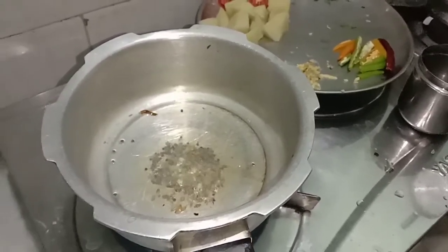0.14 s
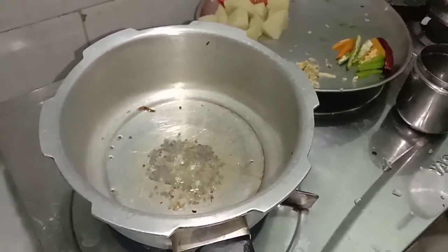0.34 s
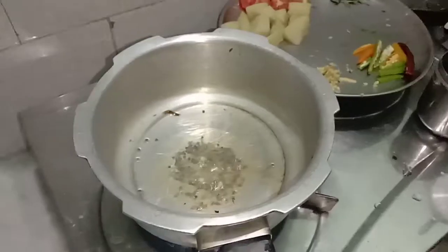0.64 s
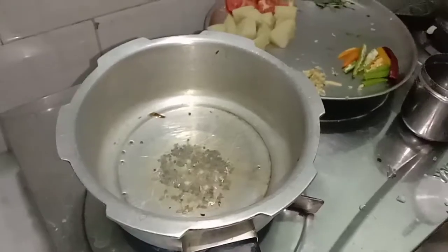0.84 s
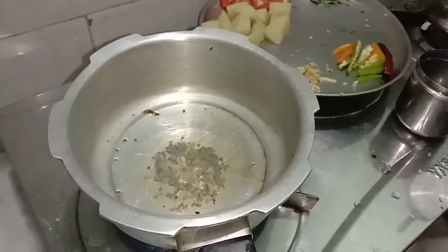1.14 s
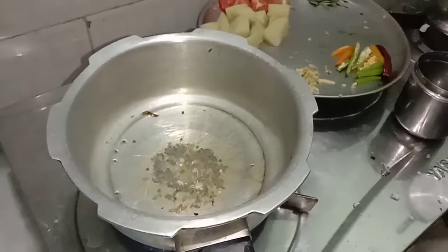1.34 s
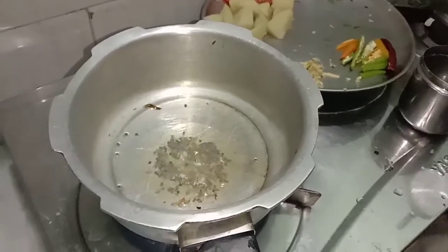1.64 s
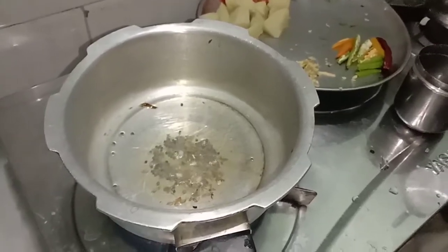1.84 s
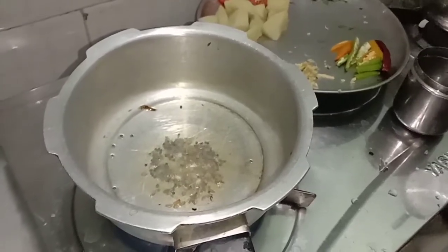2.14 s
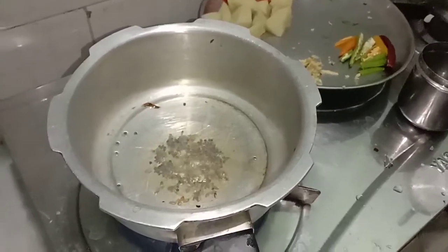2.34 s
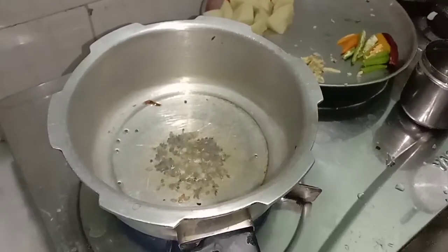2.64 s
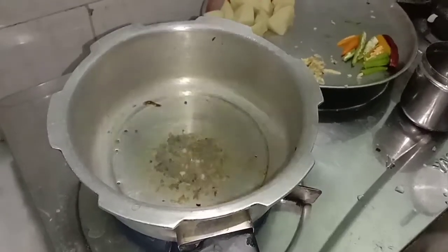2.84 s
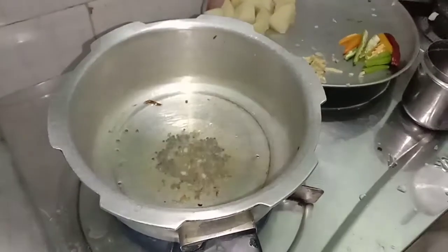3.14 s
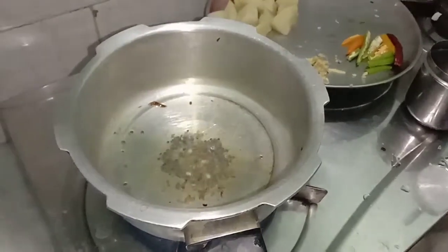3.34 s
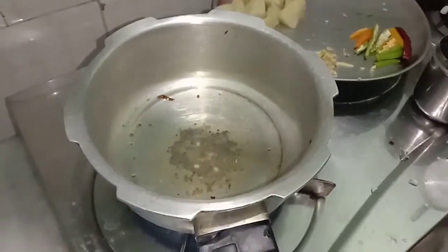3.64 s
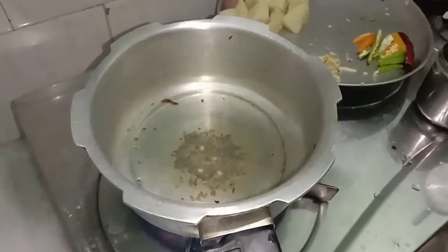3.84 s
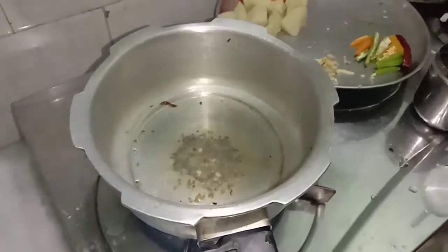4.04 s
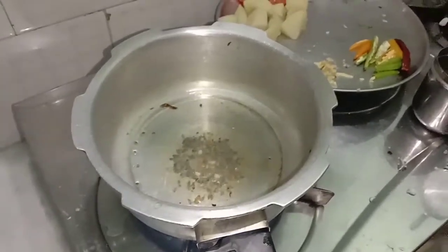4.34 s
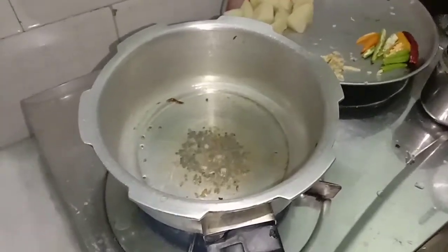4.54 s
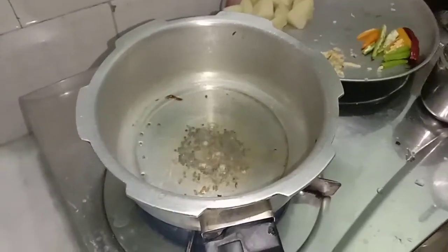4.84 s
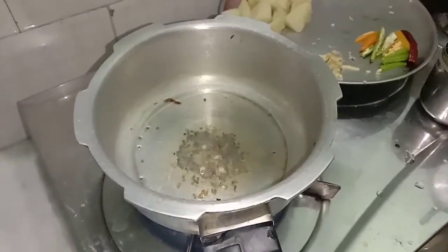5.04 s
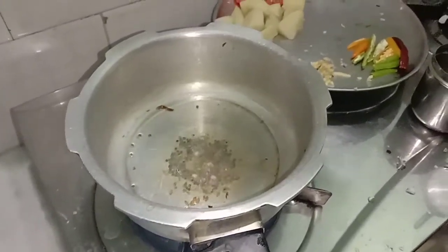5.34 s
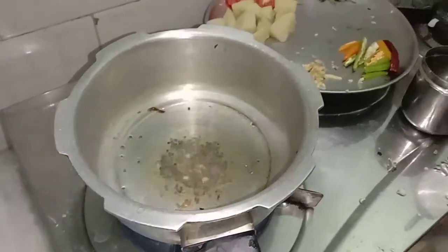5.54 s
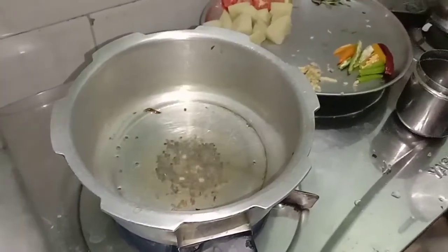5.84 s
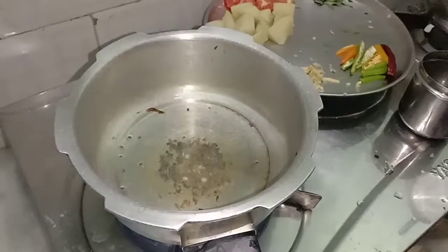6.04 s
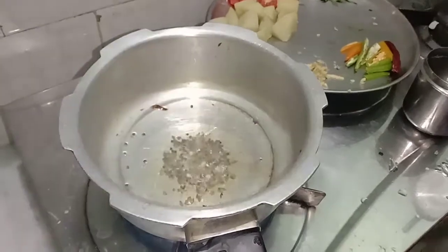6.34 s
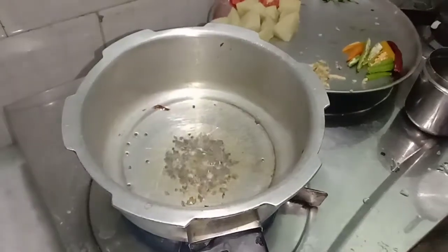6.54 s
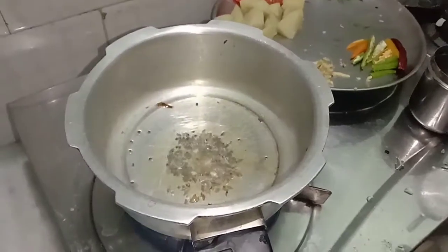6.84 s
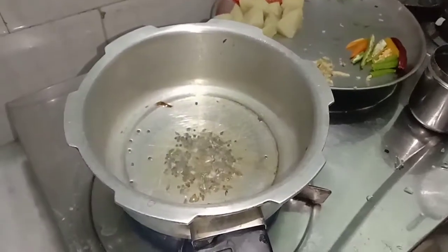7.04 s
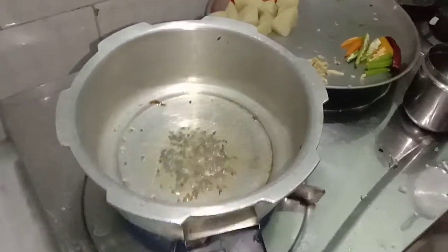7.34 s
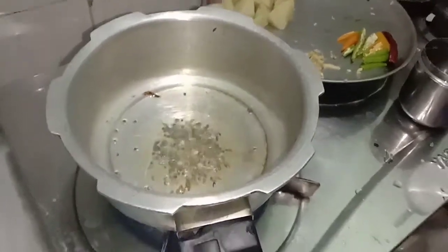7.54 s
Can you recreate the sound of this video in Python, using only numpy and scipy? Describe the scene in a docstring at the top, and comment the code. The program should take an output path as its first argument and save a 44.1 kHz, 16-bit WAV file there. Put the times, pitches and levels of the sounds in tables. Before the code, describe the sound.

Close to a stove in a small kitchen, oil sizzles faintly in a metal pot while a burner murmurs. Single seeds snap sharply, each ringing briefly in the pot, and steam spits as steel dishes are softly knocked and rubbed. After one loud crack and a short lull, the hiss swells and the popping turns quick and dense, with another metallic knock among the pops.

```python
"""Seeds popping in hot oil

Seeds burst at the bottom of a deep metal pot, first one by one, then close together. Each burst
cracks, rings the air in the pot and dies away in a small tiled kitchen; some loud ones also thump.
The oil sizzles and steam spits now and then. Steelware is knocked and rubbed nearby, a few soft low
bumps and a brief hum sound, and the burner murmurs under it all."""
import sys
import numpy as np
from scipy import signal
from scipy.fft import rfft, irfft
from scipy.io import wavfile
from scipy.ndimage import uniform_filter1d

SR = 44100
rng = np.random.default_rng(int(sys.argv[2]) if len(sys.argv) > 2 else 0)


def wrap_up_sound(samples):
    """Save the sound to the file named by the first command line argument, as 16-bit audio."""
    columns = np.atleast_2d(samples).T
    # keep every value between -1 and 1, then stretch to whole-number steps
    tamed = np.clip(columns, -1, 1)
    steps = np.round(tamed * 32767).astype(np.int16)
    wavfile.write(sys.argv[1], SR, steps)


N = 339129

# air and wall resonances of the pot: f/Hz, width/Hz, gain/dB
POT_MODES = [(821, 200, 11.5), (1251, 72, 11.5), (1802, 100, 7), (2240, 173, 0.5), (3040, 260, 5),
             (3696, 160, 2), (4855, 140, 1), (5550, 59, 4.5), (6940, 140, 4.5), (7300, 190, 6),
             (9350, 1750, 4.5)]
# response of the microphone and its port: f/Hz, gain/dB
MIC_RESPONSE = [(60, -18.5), (300, -14.5), (600, -15), (1500, -9), (2200, -9), (6000, -2.5), (10500, -3),
                (12500, -6), (13800, -4.5), (14800, 3), (15400, 8.5), (15650, -47), (17000, -22)]


def amp(db):
    return 10 ** (np.asarray(db) / 20)


def unit_rms(x):
    return x / np.sqrt(np.mean(x ** 2) + 1e-20)


def decay(t, t60_s):
    return np.exp(-np.log(1000) * t / t60_s)


def curve_db(points, hz):
    """Interpolate (f/Hz, level/dB) points over log frequency."""
    f, db = np.transpose(points)
    return np.interp(np.log(hz + 1), np.log(f + 1), db)


def peaks_db(peaks, hz):
    """Sum of bell curves (f/Hz, width/Hz, gain/dB)."""
    return sum(db / (1 + (2 * (hz - f) / width) ** 2) for f, width, db in peaks)


def add(mix, start_s, sound):
    part = mix[round(start_s * SR):][:len(sound)]
    part += sound[:len(part)]


def colour(x, gain_db):
    """Minimum-phase filter with the response gain_db(hz)."""
    size = 4096
    cepstrum = irfft(np.log(amp(gain_db(np.fft.rfftfreq(size, 1 / SR)))))
    cepstrum[1:size // 2] *= 2
    cepstrum[size // 2 + 1:] = 0
    impulse = irfft(np.exp(rfft(cepstrum)))
    return signal.oaconvolve(x, impulse)[:len(x)]


def patchy_noise(spectrum, levels, patch_db, patch_bins, patch_frames):
    """Noise with drifting spectral patches, following a (t/s, level/dB) curve."""
    frames, hz = N // 256 + 5, np.fft.rfftfreq(1024, 1 / SR)
    real, imag, patches = rng.standard_normal((frames, len(hz), 3)).T
    patches = uniform_filter1d(patches, patch_bins, axis=0)
    patches = unit_rms(uniform_filter1d(patches, patch_frames, axis=1))
    stft = (real + 1j * imag) * amp(curve_db(spectrum, hz)[:, None] + patch_db * patches)
    noise = unit_rms(signal.istft(stft, nperseg=1024, noverlap=768)[1][:N])
    return amp(np.interp(np.arange(N) / SR, *np.transpose(levels))) * noise


def burner():
    """Low murmur of the flame."""
    spectrum = [(18, -79), (30, -34), (97, 6.5), (171, -12.5), (197, -15.5), (300, -8), (465, -15.5),
                (595, -9), (876, -19.5), (1040, -14.5), (2000, -20), (2600, -98), (4400, -120)]  # f/Hz, relative density/dB
    levels = [(0.0, -62), (0.51, -61.5), (4.24, -62), (4.67, -59), (7.69, -60.5)]  # t/s, level/dB
    return patchy_noise(spectrum, levels, patch_db=2.95, patch_bins=3, patch_frames=18)


def sizzle():
    """Continuous hiss of frying oil, coloured by the pot."""
    spectrum = [(900, -57), (1300, -4), (1900, -1), (2500, 0), (3800, -1.5), (5300, -1), (6300, -6),
                (7100, 1.5), (8000, -4.5), (9500, 0.5), (10800, -6.5), (12600, -14), (14900, -5),
                (15500, 0), (16000, -48)]  # f/Hz, relative density/dB
    levels = [(0, -69.5), (.9, -60), (1.5, -66), (2.4, -69), (3, -69), (4.25, -69), (4.6, -43.5),
              (5.35, -65.5), (5.6, -53), (6.6, -60), (6.9, -47), (7.3, -55), (7.69, -64.5)]  # t/s, level/dB
    hiss = patchy_noise(spectrum, levels, patch_db=2.5, patch_bins=5, patch_frames=14)
    return colour(hiss, lambda hz: 0.72 * peaks_db(POT_MODES, hz))


def thump(level_db, hz, length_s):
    """A low sine under a smooth hump: the thump of a loud pop, a soft bump or, if long, a hum."""
    t = np.arange(0, length_s, 1 / SR)
    return amp(level_db) * np.sin(2 * np.pi * hz * t) * np.sin(np.pi * t / length_s)


def steel_knock(level_db, centre_hz, spread_oct, t60_factor, contact_s):
    """A gritty contact ticks and rings the steel modes around centre_hz; the walls smear both."""
    steel_modes = [(520, -4, .14), (630, -7, .12), (904, -5, .16), (946, -7, .2), (1039, -4.5, .16),
                   (1150, -6, .1), (1260, 0, .2), (1500, -9, .1), (1810, -7, .2), (2030, -6, .13),
                   (2293, -4, .12), (2700, -9, .1), (3036, -5, .1), (3280, -3, .13), (4544, -2, .13),
                   (5507, -10, .07), (6100, -9, .05), (6498, -1, .09), (7250, -3, .14), (8489, -10, .05)]  # f/Hz, level/dB, t60/s

    def excitation_db(hz):
        return np.maximum(-6 * (np.log2(hz / centre_hz + 0.0033) / spread_oct) ** 2, -80)

    t = np.arange(SR // 2) / SR
    excited = [mode for mode in steel_modes if excitation_db(mode[0]) > -50]
    hz, mode_db, t60_s = np.transpose(excited)[:, :, None]
    jitter = rng.standard_normal((len(steel_modes), 70))[:len(hz)]
    rattle = 1 + 0.75 * unit_rms(signal.resample(jitter, len(t), axis=1))  # loose stack
    envelopes = amp(mode_db + excitation_db(hz)) * rattle * decay(t, t60_s * t60_factor)
    ring = (envelopes * np.sin(2 * np.pi * hz * t)).sum(0)
    tick = colour(rng.standard_normal(len(t)) * decay(t, 0.02), excitation_db)
    direct = unit_rms(ring) + amp(-8) * unit_rms(tick)
    room = rng.standard_normal(SR // 4) * decay(t[:SR // 4], 0.4)
    reverb = signal.fftconvolve(direct * decay(t, 0.27), room / np.linalg.norm(room))[:len(t)]
    contact_samples = round(contact_s * SR) + 3
    force = rng.standard_normal(SR // 4)[:contact_samples] * np.hanning(contact_samples)
    force *= contact_s / 0.012 / np.linalg.norm(force)  # long contacts are mostly scrape
    force[0] += 1  # the blow
    struck = signal.fftconvolve(direct + amp(-8) * reverb, force)[:len(t)]
    low_cut = signal.butter(3, 350, "high", fs=SR, output="sos")  # small vessels radiate no bass
    return amp(level_db) * unit_rms(signal.sosfilt(low_cut, struck))


def spot_peaks(count, width_hz, sigma_db):
    """Random peaks and dips set by the spot of a burst in the pot."""
    centres_hz = rng.uniform(1500, 11000, count)
    return [(f, width_hz, db) for f, db in zip(centres_hz, rng.normal(0, sigma_db, count))]


def steam_spurt(swell_s, hold_s, level_db, brightness):
    """Hiss of tiny uneven bursts, coloured by the pot; it swells and brightens, holds, then fades."""
    swell_db, fade_db_per_s, fade_s = 7.5, 320, 0.11
    t = np.arange(0, swell_s + hold_s + fade_s, 1 / SR)
    grains = rng.standard_normal(len(t))
    grains *= amp(3.2 * unit_rms(uniform_filter1d(rng.standard_normal(len(t)), 90)))
    peaks = POT_MODES + spot_peaks(14, width_hz=200, sigma_db=3) + [(13740, 11300, -26)]

    def hiss(db_per_oct):
        tilted = colour(grains, lambda hz: db_per_oct * np.log2(hz / 4000 + 0.049) + peaks_db(peaks, hz))
        return unit_rms(tilted)

    rise = np.minimum(t / swell_s, 1)
    blend = brightness * rise
    steam = (1 - blend) * hiss(-6) + blend * hiss(3)
    envelope_db = swell_db * (rise - 1) - fade_db_per_s * np.maximum(t - swell_s - hold_s, 0)
    return amp(level_db + envelope_db) * steam * signal.windows.tukey(len(t), 0.05)


def seed_pop(level_db, body_db, ring_hz, ring_db, tail_db):
    """A seed bursts: a snap, quick echoes between the pot walls, then the tail of the kitchen."""
    bands_hz = [400, 1000, 8000, 14500]  # bass, body, treble, top: f/Hz
    t = np.arange(SR // 3) / SR
    snap = rng.choice([-1., 1.], len(t)) * (1 - decay(t, 0.001)) * decay(t, 0.006)
    pot_noise, room_noise = rng.standard_normal((2, len(t)))
    echoes = amp(-7) * pot_noise * decay(t, 0.03)
    lows = uniform_filter1d(room_noise, size=3)
    highs = room_noise - lows
    tail = amp(tail_db) * (lows * decay(t, 0.28) + 0.77 * highs * decay(t, 0.2))  # walls absorb treble
    burst = 1.9 * snap + (1 - decay(t, 0.008)) * (echoes + 1.5 * tail)
    top_db = -5 - 0.6 * ring_db  # hollow pops are duller
    tilt = np.transpose([bands_hz, [body_db - 5, body_db, 0, top_db]])
    peaks = POT_MODES + spot_peaks(8, width_hz=400, sigma_db=2.5) + [(ring_hz, 1500, ring_db)]

    def shape_db(hz):
        return curve_db(tilt, hz) + peaks_db(peaks, hz)

    grid_hz = np.fft.rfftfreq(512, 1 / SR)
    mean_db = 10 * np.log10(np.mean(amp(shape_db(grid_hz) + curve_db(MIC_RESPONSE, grid_hz)) ** 2))
    return amp(level_db) * colour(burst, lambda hz: shape_db(hz) - mean_db)


def scene():
    """Pops, steam and sizzle pass the pot wall modes; knocks, thumps and burner are added plain."""
    # seed bursts: t/s, level/dB, body over treble/dB, hollow ring f/Hz, ring gain/dB, tail gain/dB
    pops = [(0.1844, -28, 5, 4030, -3.5, -13), (0.519, -20, 25, 2930, 2, -15),
            (0.6739, -26.5, -20, 4220, 18, -27), (0.9292, -27.5, 19, 4330, 0, -20),
            (0.9796, -31, 14, 2600, 2, -18), (1.3008, -28.5, 3.5, 3740, 18.5, -10),
            (1.899, -30, -1, 4700, 4, -13.5), (2.2537, -35, 3, 4820, 3, -6.5),
            (2.9546, -36.5, 9, 3870, 22, -16), (2.9686, -11, -8.5, 4300, 0.5, -14),
            (3.0435, -24.5, 5.5, 3020, 20.5, -10.5), (3.1856, -17, -3.5, 2980, -2.5, -18),
            (3.4275, -44.5, 5, 4200, 1, -4.5), (3.4417, -31.5, -28, 4050, 11, -20.5),
            (3.6216, -22, 5.5, 4270, 12.5, -13), (3.7684, -53.5, 15, 4170, 18, -4.5),
            (3.905, -59, -7, 3500, 18, -6.5), (4.2898, -19.5, 4.5, 3460, 19.5, -14),
            (4.622, -17, 7.5, 3020, 12.5, -15.5), (4.6828, -22, -7, 4400, 6.5, 1.5),
            (4.7589, -21.5, 2.5, 4370, 7, -11.5), (4.95, -44, 9, 3440, 4, -4),
            (4.9648, -12, 3, 3200, 7.5, -16), (5.1516, -31, 6, 4350, 2, -15.5),
            (5.2419, -54.5, 5, 3100, -6, -1.5), (5.3573, -49, -3, 3260, 1, 0.5),
            (5.3803, -27, 2.5, 3440, 7, -11.5), (5.417, -21, 7, 3650, 16, -18),
            (5.4965, -32, 5, 4220, 14, -12), (5.5253, -30.5, 8.5, 3770, 8.5, -8),
            (5.594, -20, 4, 3600, 11, -13.5), (5.736, -28.5, 14, 3160, 24, -15),
            (5.7726, -19, 11.5, 4060, 13, -8.5), (5.863, -23, 20.5, 3280, 12.5, -10.5),
            (5.9094, -42, 37, 3200, 5, 0), (6.0276, -23, 6.5, 2850, 6, -11),
            (6.0667, -38, 20.5, 3750, 16, -2.5), (6.1858, -18.5, 2, 3100, -3.5, -17.5),
            (6.2275, -18.5, 9, 3570, 25, -16), (6.31, -20.5, -4.5, 3330, 2, -15.5),
            (6.3704, -34.5, 1.5, 3300, 13, -4.5), (6.4541, -34.5, 5, 3620, 0, -7.5),
            (6.529, -38, 26, 3850, 15.5, -11.5), (6.6141, -27, 4, 3380, 10.5, -12.5),
            (6.6546, -36, 15, 3560, -6, -11), (6.6873, -37, 7, 3560, 17, -1),
            (6.7173, -19.5, 4.5, 2880, 16, -9), (6.837, -12.5, -3, 3750, 1, -13.5),
            (6.8742, -23, -1, 3160, 22, -14.5), (6.937, -27.5, -2, 3500, 8, -16.5),
            (6.993, -19.5, -1.5, 3400, 8, -12), (7.0615, -19.5, -2.5, 5340, 9, -15.5),
            (7.1244, -19, 1.5, 3680, 5, -13), (7.3069, -24, 11.5, 3060, 6.5, -15),
            (7.3676, -24, 6, 3770, 15, -12), (7.4685, -38, 0, 3660, -3, -5.5),
            (7.5192, -35.5, -2, 4750, 7, -15.5), (7.627, -33.5, 10.5, 3250, 17.5, 0.5),
            (7.6357, -12, 2, 3230, -7.5, -16.5), (7.6802, -20, 3, 3940, 17, -15)]
    # steam from the oil: t/s, swell/s, hold/s, level/dB, brightness/0-1
    spurts = [(.13, 0.034, .04, -42.5, 0.4), (0.421, 0.086, 0.021, -34.5, 0.05),
              (0.584, 0.026, 0.037, -31, 1), (0.669, 0.0066, 0.023, -33, 0.55),
              (0.869, 0.076, 0.14, -32.5, 0.71), (1.243, 0.029, .012, -45, 1),
              (4.298, 0.16, .14, -37.5, 0.95), (4.671, 0.023, 0.064, -26.5, 0.97)]
    # knocks and rubs on steelware: t/s, level/dB, centre f/Hz, spread/oct, t60 factor, contact/s
    knocks = [(0.315, -66.5, 1110, .4, 1.5, 0.047), (0.533, -44, 517, 0.33, 1.5, 0.0019),
              (.831, -48, 2930, 1.27, 0.31, 0.0016), (0.867, -59, 1035, 0.17, .9, 0.033),
              (1.008, -36.5, 2400, 1.25, .7, 0.0013), (1.038, -56, 1100, 0.4, 2.3, 0.023),
              (1.096, -55, 2070, 1.15, 0.84, 0.0034), (1.14, -59.5, 967, 0.12, 0.89, 0.029),
              (1.254, -57.5, 2070, 0.24, 1.4, 0.049), (1.55, -56, 1105, 0.29, 1.04, 0.067),
              (1.555, -54.5, 4120, 0.72, .3, 0.069), (1.786, -56, 1140, 0.26, 1.2, 0.14),
              (1.827, -56.5, 5080, 0.79, 0.47, 0.023), (2.029, -67, 3490, 0.83, 0.87, 0.11),
              (2.715, -66, 2150, 0.52, 1.4, 0.038), (5.812, -31, 1070, 0.68, 1.3, 0.0047),
              (5.832, -54, 1060, 1.1, .75, 0.012), (5.959, -41.5, 944, 0.56, 1.7, 0.0059),
              (6.47, -58.5, 3300, .5, 1.4, 0.091), (6.718, -44.5, 1820, 0.14, 1.1, 0.014),
              (6.72, -45.5, 2800, 0.2, 2, 0.056), (6.779, -40.5, 5770, 0.65, 0.5, 0.033)]
    # thumps of loud pops in the pot, a few soft low bumps, a brief hum: t/s, level/dB, f/Hz, length/s
    thumps = [(2.968, -27, 109, 0.011), (2.9689, -8, 313, 0.00079), (3.184, -33, 117, 0.0027),
              (2.27, -50, 125, .07), (4.764, -44, 85.5, 0.22), (7.453, -39, 141, 0.0093)]
    bursts, plain = np.zeros((2, N))
    for mix, source, events in [(bursts, seed_pop, pops), (bursts, steam_spurt, spurts),
                                (plain, steel_knock, knocks), (plain, thump, thumps)]:
        for start_s, *settings in events:
            add(mix, start_s, source(*settings))
    pot = colour(bursts, lambda hz: curve_db(MIC_RESPONSE, hz)) + sizzle()
    plain += burner()
    # many narrow modes of the thick pot wall
    wall_modes = [(f, 50, 6) for f in np.arange(2400, 11000, 200) + rng.uniform(0, 200, 43)]
    return (colour(pot, lambda hz: peaks_db(wall_modes, hz)) + plain)[None]


def record(dry):
    """Small microphone: bass cut, soft overload, band limit."""
    low_hz, high_hz, ceiling = 68, 16800, 0.97
    thin = signal.sosfilt(signal.butter(3, low_hz, "high", fs=SR, output="sos"), dry)
    saturated = ceiling * np.tanh(thin / ceiling)
    low_pass = signal.firwin(511, high_hz, window=("kaiser", 9), fs=SR)
    return signal.oaconvolve(saturated, low_pass[None], "same")


dry = scene()
out = record(dry)
wrap_up_sound(out)
```